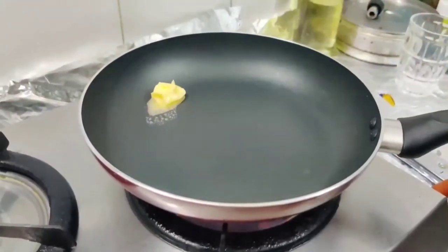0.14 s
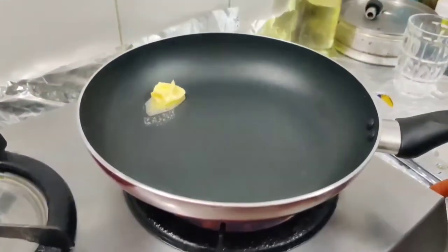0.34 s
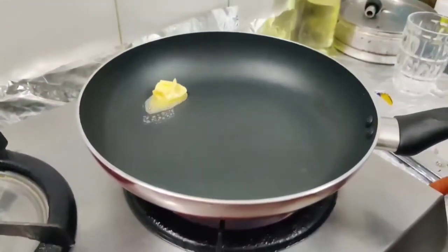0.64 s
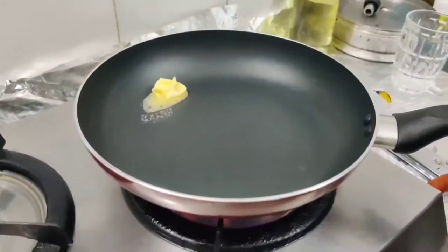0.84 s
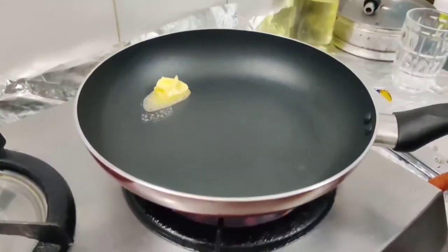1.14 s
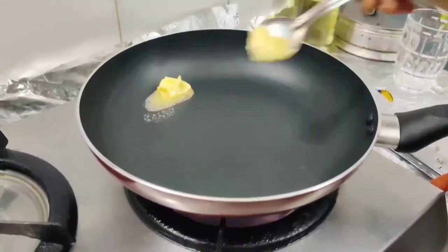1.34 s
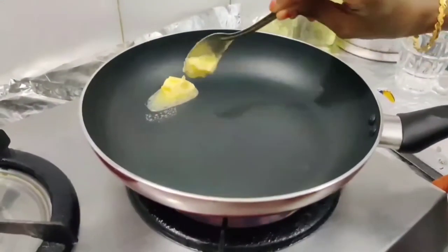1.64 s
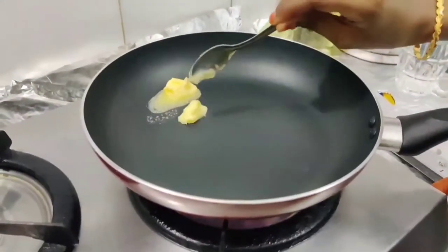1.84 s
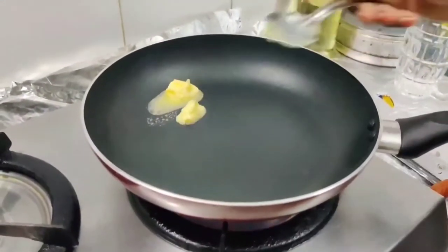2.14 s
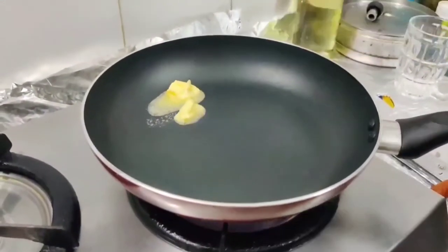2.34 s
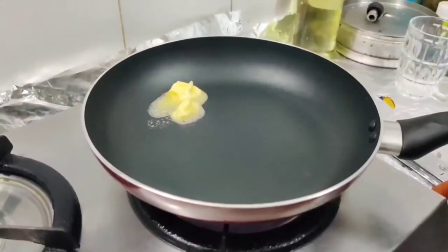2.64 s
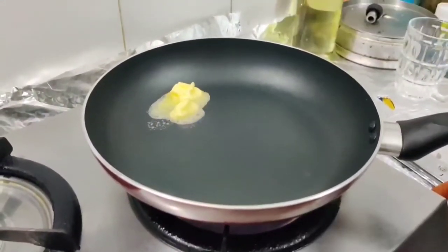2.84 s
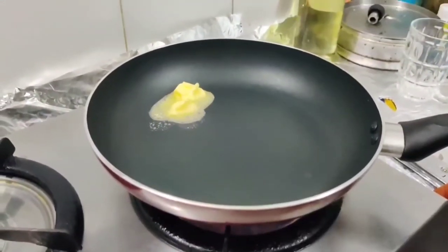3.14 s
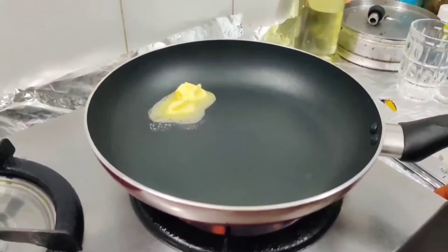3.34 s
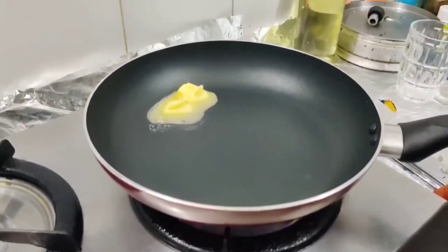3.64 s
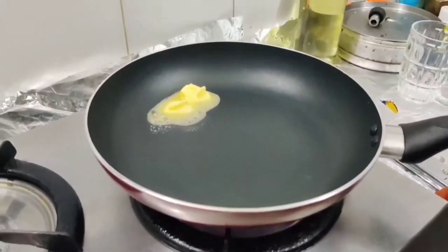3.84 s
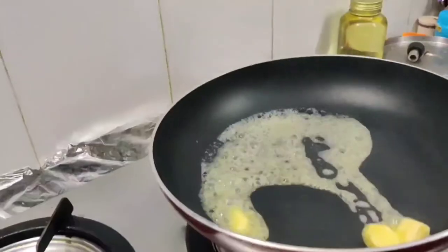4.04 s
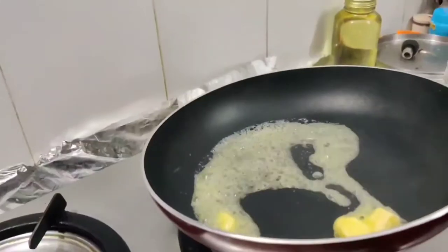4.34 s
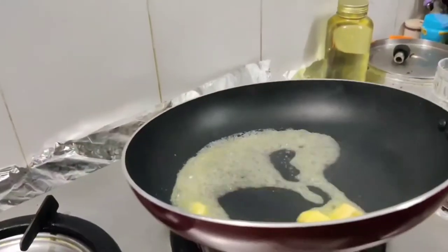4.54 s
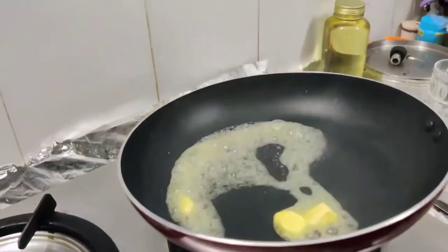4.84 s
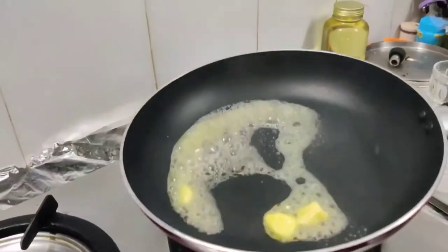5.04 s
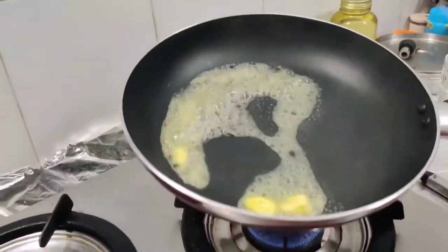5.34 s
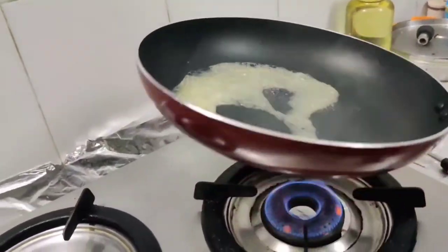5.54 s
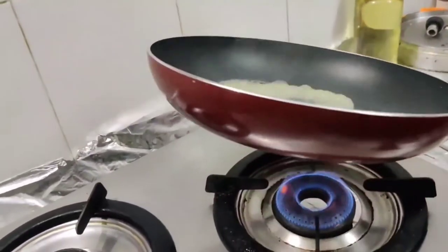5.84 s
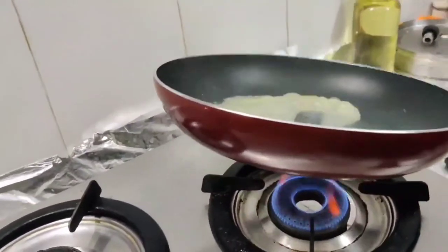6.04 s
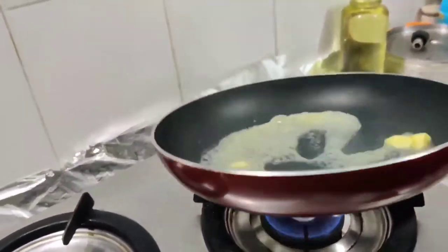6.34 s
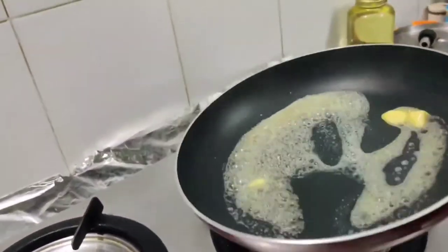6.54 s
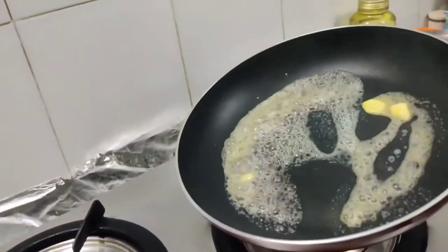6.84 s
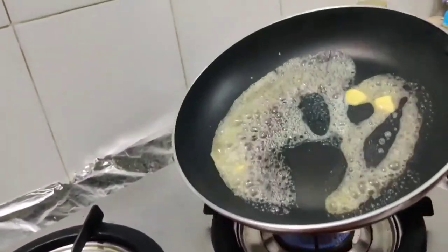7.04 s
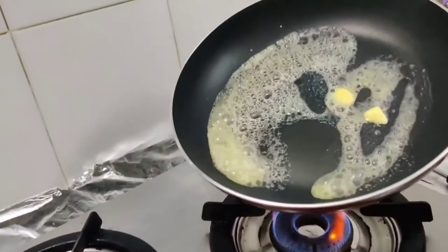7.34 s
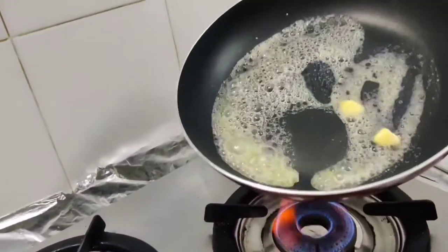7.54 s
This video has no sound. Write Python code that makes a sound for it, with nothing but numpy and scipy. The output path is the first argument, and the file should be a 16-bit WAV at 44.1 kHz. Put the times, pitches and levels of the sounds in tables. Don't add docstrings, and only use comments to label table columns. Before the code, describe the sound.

In a small tiled kitchen, close up in stereo, butter fizzes very faintly over a low gas rumble. A steel squeak and sharp spoon clack come early, with soft far hums and tiny fat spits. Midway the pan leaves its grate with a metallic ring, and a loud bright hiss starts at once, with handle knocks, hard spits and flame flutter, easing before a final steel squeak.

```python
import sys
import numpy as np
from scipy import signal
from scipy.fft import rfft, irfft
from scipy.io import wavfile

SR = 44100
rng = np.random.default_rng(int(sys.argv[2]) if len(sys.argv) > 2 else 0)


def int16_out(signal):
    q = np.round(np.clip(np.atleast_2d(signal).T, -1, 1) * 32767)
    wavfile.write(sys.argv[1], SR, q.astype(np.int16))


def ratio_of_db(decibels):
    return 10 ** (np.asarray(decibels, float) / 20)


N = 339570
TIME_S = np.arange(N) / SR
LIFT_S = 3.84


def rms_one(x):
    return x / np.sqrt(np.mean(x ** 2) + 1e-20)


def in_time(rows, before=None):
    s, *columns = np.transpose(rows)
    return [np.interp(TIME_S, s, column, left=before, right=before) for column in columns]


def at_hz(points, hz):
    points_hz, values = np.transpose(points)
    return np.interp(np.log(hz), np.log(points_hz), values)


def drift(rate):
    r = np.exp(-80 * np.pi * rate / SR)
    slow = signal.lfilter([1], [1, -2 * r, r * r], rng.standard_normal(N // 40 + 2002))[2000:]
    return np.interp(np.arange(N) / 40, np.arange(len(slow)), rms_one(slow))


def band(x, low, high):
    return signal.sosfilt(signal.butter(2, [low, high], "band", fs=SR, output="sos"), x)


def resonance(x, hz, width_hz):
    r = np.exp(-np.pi * width_hz / SR)
    zeros = np.array([1, 0, -1]) * (1 - r * r) / 2
    return signal.lfilter(zeros, [1, -2 * r * np.cos(2 * np.pi * hz / SR), r * r], x)


def narrow_noise(hz, width_hz):
    once = resonance(rng.standard_normal((2, N)), hz, width_hz)
    return rms_one(resonance(once, hz, width_hz))


def sides(db):
    return ratio_of_db(np.array([db / 2, -db / 2])).reshape(2, -1)


# (pitch [Hz], left-right likeness [0-1])
SIDE_LIKENESS = [(25, .93), (85, .98), (180, .95), (350, .8), (700, .55), (1400, .2), (3000, 0)]


def stereo(white, hz):
    alike = np.clip(at_hz(SIDE_LIKENESS, hz), 0, .995)
    middle = np.sqrt(1 + alike) * white[0]
    side = np.sqrt(1 - alike) * white[1] * np.array([[1], [-1]])
    return (middle + side) / np.sqrt(2)


def add(out, s, x):
    i = int(s * SR)
    out[:, i:i + x.shape[1]] += x[:, :N - i]


def bursts(per_s, spread_db, shared):
    sizes = ratio_of_db(spread_db * np.minimum(rng.exponential(1, N), 5)) * (rng.random(N) < per_s / SR)
    left = sizes * rng.choice([-1, 1], N)
    right = left * np.where(rng.random(N) < shared, 1, -1)
    return rms_one(np.array([np.roll(left, 1), right]) + 0.44 * rng.standard_normal((2, N)))


# (time [s], vigour [dB], fineness of the bubbles [dB], left-right [dB])
FIZZ = [(0, -49, 0.5, -5), (1.1, -50, 1.5, -1.5), (1.7, -46, -0.5, -3.5), (1.88, -44, 0, -1.5),
        (2.08, -44.5, 0.1, -2), (2.4, -41.5, 0.5, -3), (3.5, -40, 0, 0), (3.84, -37, -0.5, 0),
        (3.868, -22, -4, 1), (4.25, -21.5, -2.4, 3), (4.56, -21.5, 0.7, 1.8), (5.1, -21, 0.8, 1.8),
        (5.8, -25, -1.5, 0.3), (5.95, -25, -0.2, 1.2), (6.8, -27, 2, 0.3), (6.88, -28.5, 2.5, 2.5),
        (7.3, -25.5, 0.2, 1), (7.7, -25.5, -4.5, -3)]
BUBBLE_EDGES = [930, 3200, 5200, 7400, 16300]
# (share melting [dB], share foaming [dB], pull of fineness [dB/dB], surge [dB])
BUBBLE_SIZES = [(-14.5, -13, -0.22, 0.84), (-7, -6, -0.7, 0.87), (-5, -3, 0.3, .5), (-3, -5.5, 0.76, 0.7)]
# (time [s], length [s], swell [dB])
SWELLS = [(2.252, .06, 2.5), (2.486, 0.06, 3), (2.77, .06, 1), (3.278, 0.11, 5), (3.5, 0.063, 4),
          (3.7, .06, 4), (4.072, 0.043, 2), (4.464, .04, 2), (4.625, 0.13, 2.2), (5.068, 0.048, 2),
          (5.32, .08, 2), (5.697, 0.3, 3.5), (6.06, 0.045, 0.5), (6.82, .025, 3.5)]
SWELL_SHARES = (0.085, 0.22, 0.93, 0.12)
# (pitch [Hz], level [dB per Hz])
MELT_COLOUR = [(1000, -39), (1400, -10), (2100, -13.5), (3200, -5.5), (4400, 0.5), (5250, -1), (6150, 6.5),
               (6800, 2.5), (7700, -3.5), (9000, -10), (11500, -11), (13300, -14), (15600, -14.5)]
# (pitch [Hz], level [dB per Hz])
FOAM_COLOUR = [(1000, -22), (2000, -16.5), (2950, -10), (3500, -3.5), (3950, -2), (4410, -2), (4900, 0.5),
               (5420, 4), (6150, 9), (6700, 6), (7310, -5), (8780, -10), (11600, -9.5), (15300, -8)]
# (pitch [Hz], left-right [dB])
FIZZ_LEAN = [(1300, -.7), (2800, -.9), (5500, 0), (9500, -2.2), (14000, -3.1)]


def fizz():
    vigour_db, fine_db, pan_db = in_time(FIZZ)
    foaming = TIME_S > LIFT_S
    swarms = [bursts(4000, spread_db=2.5, shared=.56) for _ in range(3)]
    swell_db = sum(db * np.exp(-((TIME_S - s) / length) ** 2) for s, length, db in SWELLS)
    surging = np.where(foaming, .35, 1)
    seethe_db = .6 * surging * drift(9) + .6 * drift(40)
    out, k = np.zeros((2, N)), 0
    zones = zip(BUBBLE_EDGES, BUBBLE_EDGES[1:], BUBBLE_SIZES, SWELL_SHARES)
    for low, high, (melt_db, foam_db, pull, surge_db), swell_share in zones:
        zone_db = vigour_db + np.where(foaming, foam_db, melt_db) + pull * fine_db
        zone_db = zone_db + swell_share * swell_db + surge_db * surging * drift(8.5)
        edges = np.geomspace(low, high, 2 + int(7 * np.log2(high / low)))
        zone, power = 0, 0
        for a, b in zip(edges, edges[1:]):
            hz, k = np.sqrt(a * b), k + 1
            colour_db = np.where(foaming, at_hz(FOAM_COLOUR, hz), at_hz(MELT_COLOUR, hz))
            gain = ratio_of_db(colour_db) * np.sqrt(b - a)
            ringing = rms_one(band(swarms[k % 3], a, b)) * ratio_of_db(0.69 * drift(5.6) + 0.9 * drift(42))
            zone = zone + gain * ringing * sides(at_hz(FIZZ_LEAN, hz))
            power = power + gain ** 2
        out += zone / np.sqrt(power) * ratio_of_db(zone_db + 2.0)
    return out * ratio_of_db(seethe_db) * sides(pan_db + 1.9 * drift(4.2))


# (time [s], spread [s], level [dB], pitch [Hz], width [Hz])
FAT_RUNS = [
    (3.86, 0.0062, -24.5, 4420, 560),
    (6.1, .4, -29.5, 4700, 1300),
    (7.0, .5, -38, 4800, 1300),
]


def fresh_fat():
    swarm = bursts(2500, spread_db=3.5, shared=.55)
    fade_db_per_s = 7.5
    out = 0
    for s, spread, db, hz, width_hz in FAT_RUNS:
        wetted = np.clip((TIME_S - s) / spread, 0, 1)
        level = ratio_of_db(db - fade_db_per_s * (TIME_S - s - spread))
        singing = rms_one(resonance(resonance(swarm, hz, width_hz), hz, width_hz))
        out = out + wetted * level * singing
    return out * ratio_of_db(2.2 * drift(26))


# (low edge [Hz], high edge [Hz])
CRACKLE_BAND = (3200, 8800)


def crackle():
    clicks_per_s, under_fizz_db = 250, -11
    sizes = ratio_of_db(2.5 * np.minimum(rng.exponential(1, N), 4)) * (rng.random(N) < clicks_per_s / SR)
    clicks = sizes * rng.choice([-1, 1], N)
    placed = clicks * sides(rng.normal(0, 4, N))
    return rms_one(band(placed + 1e-18, *CRACKLE_BAND)) * ratio_of_db(in_time(FIZZ)[0] + under_fizz_db)


# (time [s], peak [dB], pitch [Hz], left-right [dB])
SPITS = [(0.0623, -23, 6600, -10), (0.3421, -31, 6240, -1.5), (0.5282, -30, 7540, -6),
         (0.6645, -24, 7200, -9), (0.744, -21, 5850, 8), (1.1548, -31, 7400, -7), (1.2424, -29.5, 5860, 13),
         (1.414, -26, 7460, -4), (1.5953, -27, 7380, -3), (1.8503, -26, 7300, -11), (2.3386, -21, 6250, -1),
         (2.398, -22, 6270, 0), (2.4246, -20, 6260, 3), (2.474, -20, 6300, 12), (2.7794, -18.5, 6000, 9),
         (3.028, -22.5, 5980, 13), (3.208, -22, 6240, 13), (3.331, -20, 7650, -7), (3.487, -21, 5900, 7),
         (3.6611, -31, 7650, -2), (5.058, -2, 6040, 2.0), (5.852, -4, 6480, 9), (6.811, -7, 5600, -5),
         (7.1676, -10, 6400, 3.5), (7.278, -14, 5100, -6), (7.4757, -8.5, 4840, -7)]


def spits():
    out, t = np.zeros((2, N)), np.arange(3000) / SR
    for s, db, hz, pan_db in SPITS:
        air = resonance(rng.standard_normal((2, len(t))), hz, 860)
        puff = air * (0.51 * np.exp(-t / 0.0033) + 0.29 * np.exp(-t / 0.025))
        ring = np.sin(2 * np.pi * hz * t) * np.exp(-t / 0.0022)
        add(out, s, ratio_of_db(db) * (0.32 * ring + puff) * sides(pan_db))
    return out


# (time [s], peak [dB], pitch [Hz], push [s])
BUMPS = [
    (3.316, -42, 453, 0.0033),
    (4.745, -31, 796, 0.0022),
    (4.869, -32.5, 765, 0.0019),
    (5.197, -34.5, 814, 0.0029),
    (5.568, -41, 790, 0.0072),
    (5.643, -38, 816, 0.0044),
    (6.052, -21.5, 378, 0.00057),
    (6.615, -32, 310, 0.0027),
    (6.839, -33, 348, 0.0027),
]


def bumps():
    out, t = np.zeros((2, N)), np.arange(3000) / SR
    for s, db, hz, push_s in BUMPS:
        push = np.clip(push_s, .0005, .01)
        shape = (t / push) * np.exp(1 - t / push)
        add(out, s, ratio_of_db(db + 3.0) * np.cos(2 * np.pi * hz * t) * shape * sides(0.))
    return out


# (time [s], rise [s], crack [dB], crack length [s], tail [dB])
BLOWS = [
    (0.234, .14, -36, 0.18, -55),
    (0.3824, 0.00025, -13.5, 0.0016, -30),
    (0.39, 0.001, -30, 0.005, -37),
    (3.75, 0.011, -27, 0.023, -31),
    (3.7657, 0.0017, -17, 0.0037, -22.5),
]
# (pitch [Hz], level [dB per Hz])
CLACK_COLOUR = [(300, -12), (900, -1), (1700, 0.5), (2400, -13), (3500, -1.5), (5000, 1), (7200, 0.5),
                (8500, 2), (9800, -9), (11000, -5), (15000, -20)]
# (pitch [Hz], level [dB per Hz])
LIFT_COLOUR = [(200, -10), (600, -11), (1100, 3), (1700, -1), (2100, -6), (2800, 4.5), (4500, 3), (6700, 8),
               (8500, -2), (10000, -8), (15000, -13)]
# (pitch [Hz], level [dB], t60 [s])
GRATE = [(845, -32, 0.11), (1110, -29, 0.14), (1537, -32, 0.21), (1780, -30, 0.13)]


def blows():
    out, t = np.zeros((2, N)), np.arange(SR // 4) / SR
    bins_hz = np.fft.rfftfreq(len(t), 1 / SR) + 1
    for s, rise, crack_db, crack_s, tail_db in BLOWS:
        t60, colour_db = (0.21, CLACK_COLOUR) if s < 1 else (0.14, LIFT_COLOUR)
        colour = ratio_of_db(at_hz(colour_db, bins_hz))
        noise = rms_one(irfft(rfft(rng.standard_normal((2, len(t)))) * colour, len(t)))
        crack = ratio_of_db(crack_db) * np.exp(-(t / crack_s) ** 2)
        rattle = ratio_of_db(3.5 * drift(150)[:len(t)])
        tail = ratio_of_db(tail_db - 60 * t / t60) * rattle
        add(out, s, noise * (crack + tail) * np.minimum(t / rise, 1) * sides(-6.0))
    lift_s = BLOWS[-1][0]
    for hz, db, t60 in GRATE:
        ring = np.sin(2 * np.pi * hz * t + rng.uniform(0, 3.2, (2, 1)))
        add(out, lift_s, ratio_of_db(db - 60 * t / t60) * ring)
    return out


# (time [s], length [s], tone [0 low, 1 high], level [dB])
SQUEAKS = [
    (0.2, 0.19, 0, -42),
    (0.237, 0.065, 1, -38),
    (0.612, 0.14, 0, -48),
    (0.726, 0.043, 1, -47),
    (7.522, 0.086, 0, -29.5),
    (7.585, 0.094, 0, -32.5),
]


def squeak():
    tones = [narrow_noise(2700, 940), narrow_noise(5700, 700)]
    slips = ratio_of_db(3.3 * drift(46))
    out = 0
    for s, length, tone, db in SQUEAKS:
        rub = [(s, db - 14), (s + 0.27 * length, db), (s + length, db - 14)]
        rub_db, = in_time(rub, before=-120)
        out = out + ratio_of_db(rub_db + 1.5) * tones[round(tone)]
    return out * slips


# (time [s], strength [dB], share of roar over rumble [dB])
FLAME = [(0, -47, -3.5), (.4, -44.5, -2), (.62, -46.5, -7), (1.6, -49, -3.5), (2.2, -46, -3.5),
         (3.66, -45, -3), (3.73, -39.5, -8), (3.82, -49, 3), (3.9, -41, -1.5), (4.7, -41, -4),
         (5.35, -46.5, -2), (5.5, -41.5, -6), (6.4, -42.5, -3.5), (6.65, -43.5, -7.5), (7.0, -40, -12.5),
         (7.2, -44.5, -4), (7.45, -39, -6.5), (7.7, -43.5, -5.5)]
# (pitch [Hz], level [dB per Hz])
COVERED_FLAME = [(13, -39), (22, 1.5), (119, -2), (167, -5), (200, -10.5), (229, -10), (283, 0),
                 (367, -10.5), (1100, -20), (1430, -48), (2420, -120)]
# (pitch [Hz], level [dB per Hz])
OPEN_FLAME = [(13, -34), (22, -1.5), (65, -2), (152, -8), (204, -2), (501, -11.5), (620, -10.5), (806, -19),
              (889, -23.5), (1100, -10), (1430, -41), (2420, -120)]
# (pitch [Hz], width [Hz], level [dB])
ROOM_BOOMS = [(69.9, 2.8, -52), (122.3, 18.4, -53), (200.8, 18.6, -52.5)]


def flame():
    strength_db, share_db = in_time(FLAME)
    rumble_db = strength_db + 1 * drift(12)
    roar_db = strength_db + share_db
    lifted = TIME_S > LIFT_S
    white = rng.standard_normal((2, 2, N))
    edges = 24 * 2 ** np.arange(0, 5.9, 1 / 3)
    layers, powers = [0, 0], [0, 0]
    for k, (a, b) in enumerate(zip(edges, edges[1:])):
        hz = np.sqrt(a * b)
        colour_db = np.where(lifted, at_hz(OPEN_FLAME, hz), at_hz(COVERED_FLAME, hz))
        gain = ratio_of_db(colour_db) * np.sqrt(b - a)
        flutter = ratio_of_db(np.where(lifted, 3.0, 1.8) * drift(11.0))
        part = int(hz > 400)
        layers[part] = layers[part] + gain * flutter * rms_one(stereo(band(white[k % 2], a, b), hz))
        powers[part] = powers[part] + gain ** 2
    rumble, roar = [layer / np.sqrt(power) for layer, power in zip(layers, powers)]
    booms = sum(ratio_of_db(db) * stereo(narrow_noise(hz, width_hz), hz) for hz, width_hz, db in ROOM_BOOMS)
    drone_db = np.where(lifted, in_time(FIZZ)[0] - 28, -61) + 3.45 * drift(16.0)
    drone = ratio_of_db(drone_db) * stereo(narrow_noise(800, 146), 390)
    return rumble * ratio_of_db(rumble_db + 1.0) + roar * ratio_of_db(roar_db - 1.07) + booms + drone


def gas_jet():
    whistle = narrow_noise(7640, 330)
    puffs_per_s, first_puff_s, depth_db, fade_db_per_s = 11.45, 0.54, 9, -0.5
    puffs_db = depth_db * np.cos(2 * np.pi * puffs_per_s * (TIME_S - first_puff_s))
    level_db = -60.5 + puffs_db - fade_db_per_s * TIME_S + 1.5 * drift(14)
    return whistle * ratio_of_db(level_db) * (TIME_S < LIFT_S) * sides(-9)


# (time [s], length [s], pitch [Hz], level [dB])
HUMS = [
    (.10, .12, 245, -42),
    (.11, 0.086, 505, -45.5),
    (.24, 0.14, 249, -36.5),
    (.38, 0.1, 218, -38.5),
    (2.1, 0.1, 195.5, -39.5),
    (7.14, 0.12, 506, -42),
]


def hums():
    out = np.zeros((2, N))
    for s, length, hz, db in HUMS:
        t = np.arange(int(length * SR)) / SR
        tone = np.sin(2 * np.pi * hz * t + np.array([[0], [.6]]))
        add(out, s, ratio_of_db(db) * np.sin(np.pi * t / length) * tone)
    return out


def kitchen_air():
    left, own = rng.standard_normal((2, N))
    alike, lag = .3, 14
    right = alike * np.roll(left, -lag) + np.sqrt(1 - alike ** 2) * own
    hiss = rms_one(band(np.array([left, right]), 1190, 2600))
    return ratio_of_db(-56.5 + 1.8 * drift(6)) * hiss


def scene():
    pan = fizz() + fresh_fat() + crackle() + spits()
    metal = bumps() + blows() + squeak()
    burner = flame() + gas_jet()
    return pan + metal + burner + hums() + kitchen_air()


def low_pass(x):
    return signal.sosfilt(signal.butter(12, 16000, fs=SR, output="sos"), x)


def record(dry):
    top_cut = signal.ellip(12, .3, 90, 15900, fs=SR, output="sos")
    bass_cut = signal.butter(2, 28, "high", fs=SR, output="sos")
    mix = signal.sosfilt(bass_cut, signal.sosfilt(top_cut, dry))
    return low_pass(mix)


dry = scene()
out = record(dry)
int16_out(out)
```